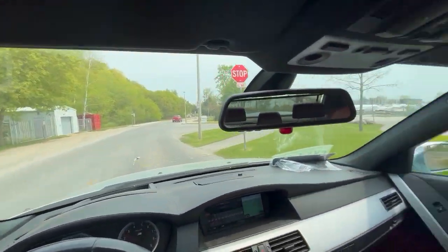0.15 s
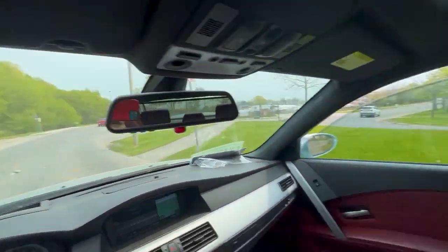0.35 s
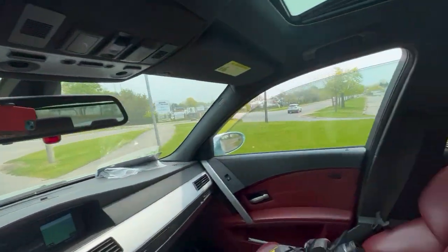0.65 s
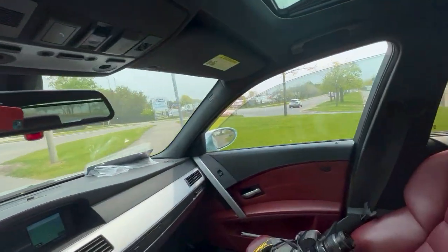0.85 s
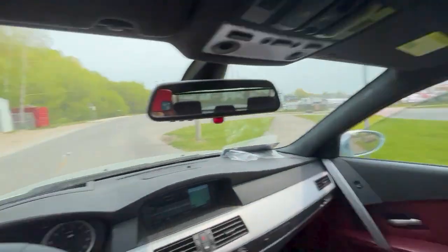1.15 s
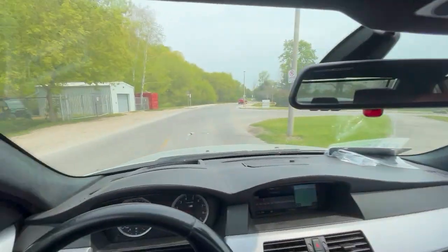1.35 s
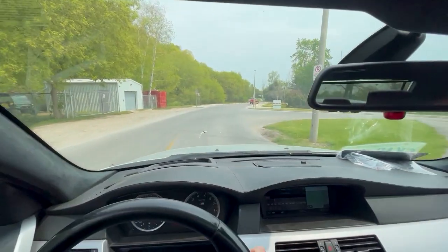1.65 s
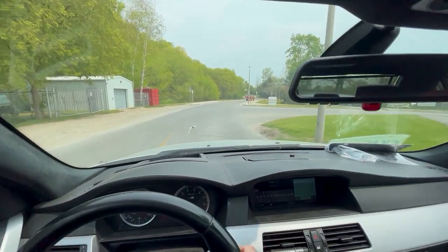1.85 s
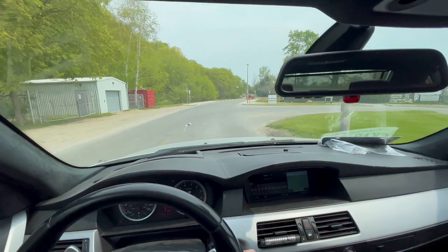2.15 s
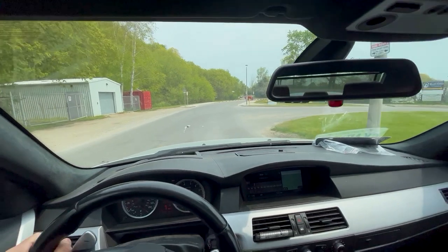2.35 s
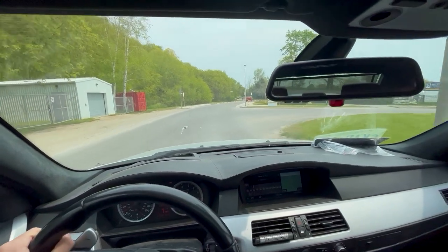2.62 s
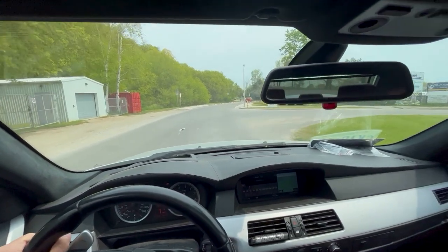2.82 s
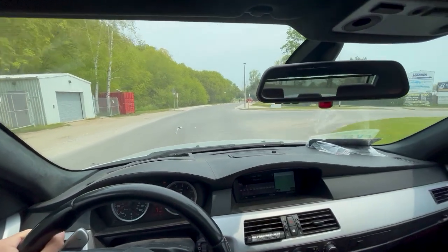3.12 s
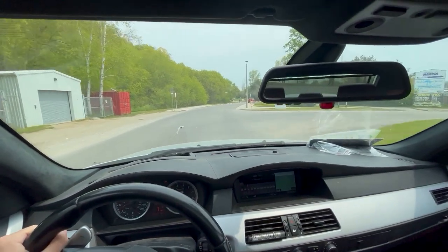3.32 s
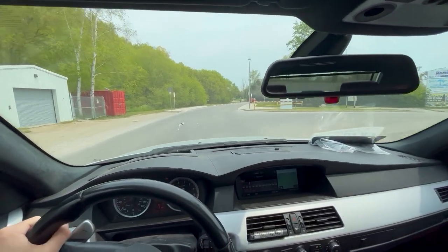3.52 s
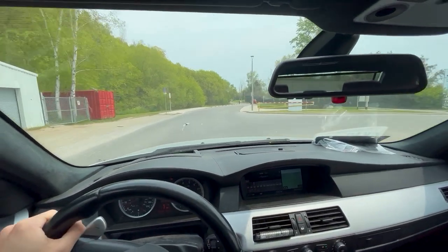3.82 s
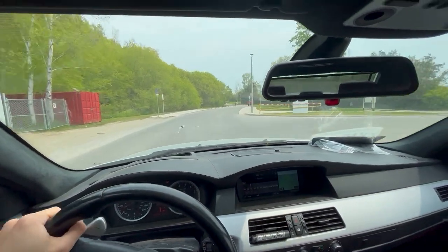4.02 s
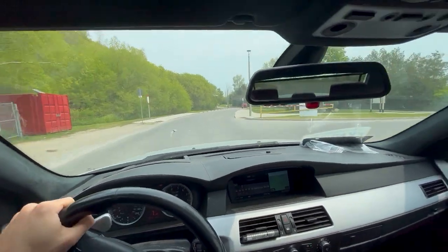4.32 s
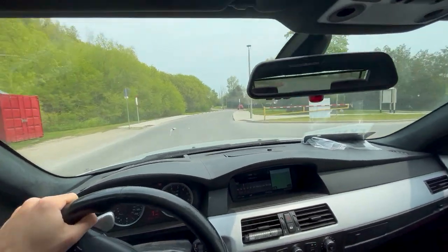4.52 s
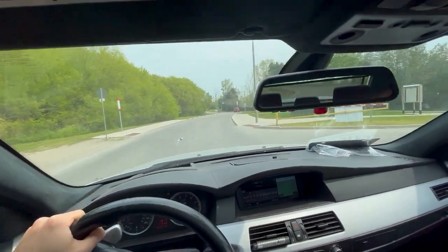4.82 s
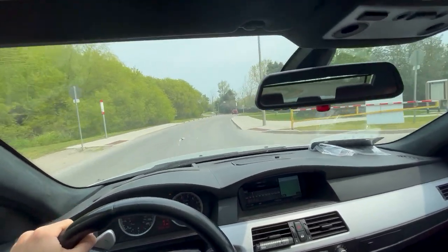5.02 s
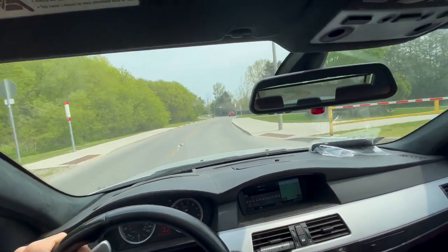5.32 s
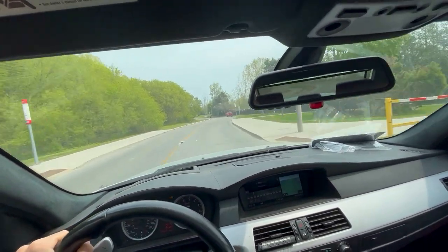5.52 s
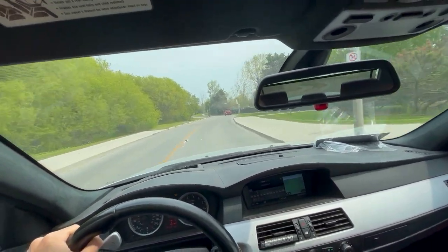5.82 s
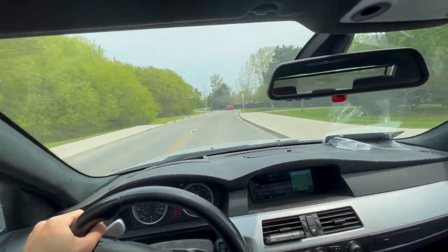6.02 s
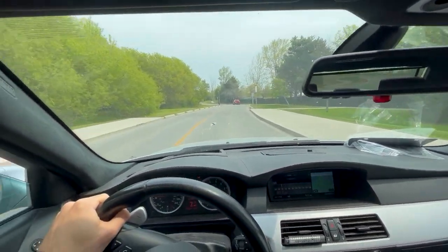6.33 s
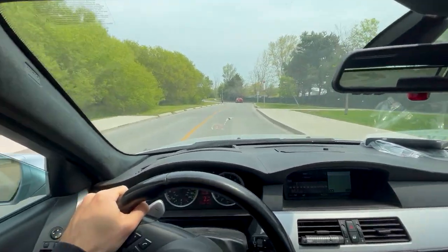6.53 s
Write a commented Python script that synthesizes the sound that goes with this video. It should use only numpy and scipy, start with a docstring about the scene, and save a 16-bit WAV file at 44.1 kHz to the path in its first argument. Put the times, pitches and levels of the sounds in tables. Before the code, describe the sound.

Heard with two ears inside a closed car, a powerful engine winds down, its exhaust booming over low road rumble and a faint belt whine. Trim ticks and squeaks, clothing rustles and a few dull knocks sound. The car then pulls away hard, the exhaust climbing in pitch and swelling through the cabin. The driver lifts off, the pitch falls, and a loose panel buzzes briefly.

```python
"""Inside the closed cabin of a ten-cylinder car, heard with two ears. First the car slows, its exhaust
booming over road rumble, engine roar and a faint belt whine, while trim ticks and squeaks. From 1 s,
clothing rustles and dull knocks join in. At 2 s the car pulls away hard: the exhaust tones climb, each
booming as it sweeps through the cabin's resonance. At 5.4 s the driver lifts off and the pitch falls.
Near the end a loose panel buzzes."""
import sys
import numpy as np
from scipy import signal
from scipy.fft import rfft, irfft, next_fast_len
from scipy.io import wavfile
from scipy.ndimage import uniform_filter1d, minimum_filter1d

SR = 44100
rng = np.random.default_rng(int(sys.argv[2]) if len(sys.argv) > 2 else 0)


def master(y):
    """Save y as 16-bit WAV."""
    cut = np.clip(np.atleast_2d(y).T, -1, 1)
    pcm = np.round(cut * 32767)  # scale
    wavfile.write(sys.argv[1], SR, pcm.astype(np.int16))


N = 294052


def from_db(db):
    """Turn decibels into a number to multiply by."""
    return 10 ** (np.asarray(db) / 20)


def rms_one(x):
    """Scale a signal so that its average size (rms) is 1."""
    return x / np.sqrt(np.mean(x ** 2) + 1e-20)


def in_time(rows):
    """Join a table's points in time with straight lines: one curve for each value column."""
    times, *columns = np.transpose(rows)
    return [np.interp(np.arange(N) / SR, times, column) for column in columns]


def at_hz(rows, hz, column=1):
    """Look up a table's value at a frequency, on a scale of octaves."""
    table = np.array(rows)
    return np.interp(np.log(hz), np.log(table[:, 0]), table[:, column])


def drift(rate_hz):
    """A smooth random wander of typical size 1."""
    step, warm_up = 40, 2000
    pole = np.exp(-2 * np.pi * rate_hz * step / SR)
    noise = rng.standard_normal(N // step + warm_up + 2)
    slow = signal.lfilter([1], [1, -2 * pole, pole * pole], noise)[warm_up:]
    return np.interp(np.arange(N) / step, np.arange(len(slow)), rms_one(slow))


def coloured(spectrum, column=1):
    """Noise with its lows and highs shaped by a table."""
    size = next_fast_len(N)
    hz = np.maximum(np.arange(size // 2 + 1) * SR / size, 1)
    return irfft(rfft(rng.standard_normal(size)) * from_db(at_hz(spectrum, hz, column)), size)[:N]


def band(x, low_hz, high_hz, order=1):
    """Keep the part of a sound between two frequencies."""
    edges_hz = [low_hz, min(high_hz, SR * .45)]
    return signal.sosfilt(signal.butter(order, edges_hz, "band", fs=SR, output="sos"), x)


def panned(x, pan_db):
    """Share a sound between the ears; pan is how much louder the left one is."""
    return x * np.vstack([from_db(pan_db / 2), from_db(-pan_db / 2)])


def add(out, start_s, sound, level_db, pan_db):
    """Mix in a short two-ear sound."""
    at = round(start_s * SR)
    out[:, at:at + sound.shape[1]] += from_db(level_db) * panned(sound, pan_db)


def bursts(rows, spread, fade_s, attack_s, snap=.01):
    """Bursts of pitched noise that fall 60 dB in fade_s, each starting with a bright snap."""
    out, t = np.zeros((2, N)), np.arange(SR // 8) / SR
    for start_s, level_db, hz, pan_db in rows:
        noise = rng.standard_normal((2, len(t)))
        noise[1] = .7 * noise[0] + .7 * noise[1]  # the ears hear partly the same noise
        body = rms_one(band(noise, hz / spread, hz * spread, order=2)) * from_db(-60 * t / fade_s)
        crack = snap * band(noise, 2500, 15000) * from_db(-60 * t / 0.014)
        add(out, start_s, (body + crack) * np.minimum(t / attack_s, 1) / 2, level_db, pan_db)
    return out


# How fast the engine's crankshaft turns: t/s, speed/(turns per s)
ENGINE_SPEED = [(0.0, 39.2), (0.38, 35.8), (0.5, 34.0), (0.75, 29.4), (1.0, 25.2), (1.12, 24.2),
                (1.28, 23.8), (1.5, 22.0), (1.62, 23.0), (1.88, 23.0), (2.0, 23.7), (2.5, 31.4),
                (2.62, 34.0), (3.0, 41.7), (3.5, 51.9), (4.0, 60.5), (4.25, 64.2), (4.62, 69.1),
                (5.0, 71.3), (5.15, 70.3), (5.4, 70.5), (5.62, 62.0), (5.75, 58.6), (5.88, 56.2),
                (6.12, 55.4), (6.38, 51.3), (6.5, 49.7), (6.67, 48.8)]
# How strong and how sharp the firing pulses are: t/s, strength/dB, sharpness/dB
FIRING = [(0.0, -8.5, -17.5), (0.4, -1.5, -19.5), (0.75, -12.5, -17.5), (1.05, -5, -14.5), (1.5, -5.5, -17),
          (1.62, -13.5, -16), (1.85, -11, -14), (2.02, -0.5, -11), (2.3, 0.5, -7), (2.62, 1, -4),
          (2.95, -2, -9), (3.2, -0.5, -1.5), (3.4, 2, -2), (3.6, 1.5, 3.5), (3.95, 1, -2), (4.2, -4, 0.5),
          (4.62, -3.5, -5.5), (5.4, -4.5, -10), (5.5, -4.5, -13), (5.85, -7, -12), (6.26, -8, -9),
          (6.34, -2.5, -9.5), (6.67, 1.5, -11.5)]
def engine():
    """The engine's speed, pulse strength and pulse sharpness at every moment."""
    return in_time(ENGINE_SPEED) + in_time(FIRING)


# Standing waves make a tone differ between the ears: f/Hz, pan/dB, left ear's lead/rad
STANDING_WAVES = [(35, 0, 0), (80, 1.5, .2), (150, 0, .3), (172, 3, 1.3), (205, 5, .3), (235, .5, -2.8),
                  (260, 1, -1.4), (315, -3.5, -3.3), (345, -4.5, -4.5), (386, -8, -5.1), (426, -4, -3.6),
                  (465, 2, -3.1), (495, 5.5, -4.8), (521, 4.5, -4.6), (585, 1, -5.2), (640, -.5, -4),
                  (780, 2, -3.4), (870, -3, -1.5), (1250, 3, -1)]
def engine_tone(order, speed, level_db, waver, across=1):
    """A tone at `order` times the engine speed; across=0 makes it the same at both ears."""
    hz = order * speed
    phase = 2 * np.pi * (np.cumsum(hz) / SR + rng.random()) + waver
    pan_db = across * at_hz(STANDING_WAVES, hz)
    lead = across * at_hz(STANDING_WAVES, hz, column=2)
    return np.sqrt(2) * panned(from_db(level_db), pan_db) * np.sin([phase + lead / 2, phase - lead / 2])


# Higher pitches at which exhaust and cabin ring: f/Hz, width/Hz, level/dB
RESONANCES = [(228, 14, -33), (270, 40, -27), (323, 54, -27.5), (418, 26, -27.5), (523, 42, -22.5),
              (590.8, 11, -23.5), (684, 110, -26.5), (855, 60, -33)]
def resonance_db(hz):
    """A tone gets louder as it nears one of the ringing pitches."""
    peaks = [from_db(db) ** 2 / (1 + (2 * (hz - centre_hz) / width_hz) ** 4)
             for centre_hz, width_hz, db in RESONANCES]
    return 10 * np.log10(sum(peaks))


# The main tones: order/(cycles per turn). 1 is the crank's unbalance, 2.5 one row of cylinders firing,
# 3.5 and 4 unequal cylinders, 5 all ten firing; the higher ones are overtones.
MAIN_ORDERS = (1, 2.5, 3.5, 4, 4.5, 5, 7.5, 12.5, 15)
# One row for each main tone: boom level/dB, share of strength, ring level/dB, share of sharpness
MAIN_MIX = [(0.7, .1, -19, .3), (-0.37, 0.83, -11.5, .3), (-25, 0.42, 1, .9), (-20, 0.47, -1.5, 3.4),
            (-22.5, 0.35, -5.5, 0.71), (0.4, 1.0, -0.04, 1.2), (-10.5, 0.58, -1.5, 1.1),
            (-19.5, .3, -9, 1.6), (-17.5, .3, -19, 1.6)]
# The cabin's deep boom, strongest near 110 Hz: f/Hz, level/dB
CABIN_BOOM = [(22, -56), (40, -40), (52, -28.5), (72, -21.5), (90, -12.5), (111, -4), (136, -5.5),
              (150, -9), (158, -16), (163, -35.5), (200, -48.5), (1000, -59)]
def exhaust_boom(speed, strength_db, sharpness_db):
    """Firing pulses make tones that swell as they slide through the boom and the higher resonances."""
    out = 0
    for order, (boom_db, strength_share, ring_db, sharp_share) in zip(MAIN_ORDERS, MAIN_MIX):
        hz = order * speed
        boom = from_db(boom_db + at_hz(CABIN_BOOM, hz) + strength_share * strength_db + .5 * drift(8))
        ring = from_db(ring_db + resonance_db(hz) + sharp_share * sharpness_db + 1.8 * drift(7))
        out += engine_tone(order, speed, 20 * np.log10(boom + ring), waver=.025 * order * drift(10))
    return out


# The weaker tones: order/(cycles per turn)
WEAK_ORDERS = (2, 3, 5.5, 6, 6.5, 7, 8, 8.5, 9, 9.5, 10, 10.5, 11.5, 12, 13.5, 17.5)
# The base level of each weaker tone: level/dB
WEAK_LEVELS = [-33, -31, -35, -34, -36, -36, -37, -37, -37, -36, -33, -36, -37, -37, -37, -35]
# How much of them the car's body and cabin let through: f/Hz, level/dB
CAR_BODY = [(25, -9), (60, 0), (110, 0), (150, 0), (180, -7), (260, -3), (330, -10), (410, -11), (470, -17),
            (560, -18), (700, -15), (800, -22), (1000, -32), (1300, -40)]
def exhaust_flutter(speed, sharpness_db):
    """No two cylinders are alike, so weaker, fluttering tones sound too."""
    out = 0
    for order, base_db in zip(WEAK_ORDERS, WEAK_LEVELS):
        lift_db = sharpness_db * order / 7.5  # harder pulses lift the high tones most
        level_db = base_db + lift_db + at_hz(CAR_BODY, order * speed) + 4 * drift(3.5)
        out += engine_tone(order, speed, level_db, waver=.04 * order * drift(5))
    return out


# When each whine sounds: order/(cycles per turn), start/s, end/s, level/dB
WHINES = [(11, -.3, .4, -50), (11, 2.9, 6.9, -62), (22, -.3, .25, -65), (22, 4.4, 5.1, -66),
          (31.4, 3.0, 4.3, -68), (40.6, -.3, 2.6, -73), (40.6, .7, .85, -66), (40.6, 2.8, 3.3, -67)]
def belt_whine(speed, fade_s=.33, fade_db=31):
    """The belt drive turns with the engine and gives faint whines that come and go."""
    out, t = 0, np.arange(N) / SR
    for order, start_s, end_s, whine_db in WHINES:
        outside_s = np.abs(t - np.clip(t, start_s, end_s))
        level_db = whine_db - fade_db * outside_s / fade_s + 3 * drift(8)
        out += engine_tone(order, speed, level_db, waver=.04 * order * drift(14), across=0)
    return out


# How loud the road is: t/s, level/dB
ROAD_LEVEL = [(0.0, -25), (0.7, -23), (1.0, -34.5), (1.4, -28), (1.9, -37.5), (2.3, -25.5), (3.0, -15),
              (3.4, -21.5), (3.8, -18), (4.8, -18), (5.3, -16), (6.0, -16.5), (6.67, -18.5)]
# The rumble's tone colour: f/Hz, level/dB
ROAD_COLOUR = [(15, -44), (25, -17), (38, -12), (54, -3), (70, 3), (108, 5), (129, -1), (151, -2),
               (200, -24), (260, -39.5), (440, -120)]
def road_rumble():
    """Tyres on the road make a low rumble, nearly the same at both ears."""
    level_db, = in_time(ROAD_LEVEL)
    alike = rms_one(coloured(ROAD_COLOUR))
    opposed = from_db(-13.5) * rms_one(band(coloured(ROAD_COLOUR), 70, 110))
    return from_db(level_db) * np.array([alike + opposed, alike - opposed])


def cabin_noise(spectrum, level_db):
    """Wavering noise: one part is alike at both ears, the other pushes at one as it pulls at the other."""
    alike, opposed = coloured(spectrum), coloured(spectrum, column=2)
    ears = np.array([alike + opposed, alike - opposed]) / np.sqrt(np.mean(alike ** 2))
    return from_db(level_db + .5 * drift(6)) * ears


def driven_db(base_db, octave_db, sharp_share, road_share, floor_db):
    """A noise level that grows with engine speed, pulse sharpness and road rumble, over a steady floor."""
    speed, _, sharpness_db = engine()
    road_db, = in_time(ROAD_LEVEL)
    octaves = np.log2(speed / 40)  # doublings from 40 turns per s
    level_db = base_db + octave_db * octaves + sharp_share * sharpness_db + road_share * road_db
    return 10 * np.log10(from_db(level_db) ** 2 + from_db(floor_db) ** 2)


# Tone colours of the low growl and the higher roar: f/Hz, alike level/dB, opposed level/dB
GROWL_COLOUR = [(30, -91.5, -79.5), (70, -62, -37.5), (130, -22.5, -7), (148, 8.5, -0.5), (274, 1.5, -9),
                (323, -9, -4.5), (444, -7.5, -13), (610, -19.5, -11.5), (820, -30, -24.5),
                (1500, -81.5, -81.5)]
ROAR_COLOUR = [(300, -53, -52), (560, -1, 4), (700, 0, 3.5), (750, -3, -1.5), (1010, -0.5, 3.5),
               (1070, -4.5, 0), (1310, -9.5, -4.5), (1560, -12, -9), (1900, -15, -16), (2200, -18, -17.5),
               (2315, -20, -17.5), (3320, -28, -32), (6000, -78.5, -76.5)]
# How loud the growl is: t/s, level/dB
GROWL_LEVEL = [(0.0, -46.5), (0.67, -52), (1.04, -46.5), (1.5, -47.5), (2.2, -40), (2.5, -40.5),
               (2.75, -35), (3.03, -42), (3.3, -35), (3.8, -29.5), (4.2, -28.5), (4.55, -33.5),
               (5.1, -31.5), (5.9, -35.5), (6.2, -37.5), (6.67, -35.5)]
def engine_roar():
    """Broad engine and air noise, which swells as the car pulls away."""
    roar_db = driven_db(base_db=-50, octave_db=9, sharp_share=.18, road_share=.17, floor_db=-63.5)
    return cabin_noise(GROWL_COLOUR, *in_time(GROWL_LEVEL)) + cabin_noise(ROAR_COLOUR, roar_db)


# The hum's tone colour: f/Hz, alike level/dB, opposed level/dB
HUM_COLOUR = [(199, -59, -58.5), (327, -9.5, -16), (433, 2, -7), (506, -11.5, -12), (570, -15, -16.5),
              (900, -62, -59.5)]
def cabin_hum():
    """The air in the cabin gives a steady, hollow hum."""
    return cabin_noise(HUM_COLOUR, level_db=-58)


# The hiss's tone colour: f/Hz, level/dB
HISS_COLOUR = [(1530, -29.5), (2600, -1), (3530, -1.5), (4830, -1.5), (8980, -12), (9750, -13.5),
               (11600, -29), (12200, -48.5), (13200, -43), (14000, -21.5), (15500, -28.5)]
def air_hiss(hiss_db):
    """High, slightly grainy air noise, a little louder on the right."""
    grain = from_db(1.2 * drift(60) + .5 * drift(12))
    alike = rms_one(coloured(HISS_COLOUR))
    opposed = from_db(1.5) * rms_one(coloured(HISS_COLOUR))
    ears = np.array([alike + opposed, alike - opposed])
    return .85 * from_db(hiss_db) * grain * panned(ears, pan_db=-1.3)


# Where the body panels ring: f/Hz, width/Hz, level/dB
BODY_PANELS = [(1800, 250, -72.5), (3000, 270, -76.5), (4520, 500, -75)]
def panel_rasp(hiss_db):
    """Body panels colour the hiss with fluttering bands of noise that rise and fall with it."""
    out = 0
    for hz, width_hz, level_db in BODY_PANELS:
        noise = band(rng.standard_normal((2, N)), hz - width_hz / 2, hz + width_hz / 2)
        out += from_db(level_db + hiss_db - hiss_db.mean() + 3 * drift(10)) * rms_one(noise)
    return out


# The clearer ticks: t/s, level/dB, f/Hz, pan/dB
TICKS = [(0.1107, -47.5, 4510, 0.5), (0.7597, -46.5, 6740, -4), (1.0725, -57.5, 4240, -21.5),
         (1.1394, -46, 8500, 1), (1.4896, -55, 4550, -4.5), (1.5843, -61, 4380, -22),
         (1.6113, -55.5, 4710, -7.5), (1.8951, -52, 5220, -10), (2.3446, -46, 4200, -12.5),
         (2.7332, -51, 2980, 5), (3.1039, -49, 4390, -15), (3.5993, -45.5, 3300, -11.5),
         (4.382, -48, 4900, -11), (4.5651, -42.5, 6640, -6), (4.7177, -43.5, 5600, -11),
         (4.813, -31, 5100, -11)]
def trim_ticks(faint_per_s=4):
    """The cabin's trim ticks sharply at set times, and faintly at random in between."""
    gap, size, colour, side = rng.random((60, 4)).T
    times = np.cumsum(-np.log(1 - gap) / faint_per_s)
    level_db = -61 + 5 * (size - .5)
    hz = 4600 * (1 + .1 * (colour - .5))
    pan_db = 16 * (side - .6)
    faint = [row for row in zip(times, level_db, hz, pan_db) if row[0] < N / SR - .2]
    return bursts(TICKS + faint, spread=1.3, fade_s=.07, attack_s=.001, snap=.9)


# Each squeak: t/s, level/dB, f/Hz, pan/dB
SQUEAKS = [(.115, -56, 4500, -4), (.34, -53, 1980, 0), (.765, -55, 6300, -6), (4.86, -58, 4550, -5)]
def trim_squeaks():
    """The trim squeaks briefly: noise in so narrow a band that it has a clear pitch."""
    return bursts(SQUEAKS, spread=1.02, fade_s=.15, attack_s=.01)


# Each rub of cloth: t/s, length/s, level/dB, pan/dB
RUSTLES = [(1.02, 0.096, -61, -4.5), (1.179, 0.084, -58, -0.5), (1.393, 0.26, -65, -3.5),
           (2.071, .06, -64.5, -13.5), (2.238, 0.17, -54, -2), (2.618, 0.067, -67, -0.5),
           (3.613, 0.216, -60, -2), (4.567, 0.036, -52.5, -1.5), (4.835, .24, -56, -6)]
def clothing_rustles():
    """Cloth rubs close by, making an uneven crackle that swells and fades with each stroke."""
    out, t = np.zeros((2, N)), np.arange(SR // 4) / SR
    for start_s, length_s, level_db, pan_db in RUSTLES:
        stroke = np.sin(np.pi * np.clip(t / length_s, 0, 1))
        clumps = from_db(5.5 * rms_one(band(rng.standard_normal(len(t)), 25, 300)))
        grains = rng.standard_normal((2, len(t))) * clumps
        add(out, start_s, rms_one(band(grains, 3200, 9000)) * stroke, level_db, pan_db)
    return out


# Each knock: t/s, level/dB, f/Hz, pan/dB
KNOCKS = [(1.05, -39, 280, 8), (1.535, -50, 650, 3), (1.583, -46, 650, 3), (1.798, -43, 550, 3),
          (1.80, -49, 1400, 0), (1.894, -45, 650, 0), (1.896, -51, 1750, -2), (2.085, -55, 2300, 0)]
def cabin_knocks():
    """Dull knocks in the cabin, lower and longer than the ticks."""
    return bursts(KNOCKS, spread=1.3, fade_s=.11, attack_s=.002)


# Each slap of the loose panel: t/s, level/dB
SLAPS = [(6.324, -39), (6.336, -36.5), (6.348, -33), (6.36, -33.5), (6.376, -33), (6.398, -40)]
# The pitches at which that panel rings: f/Hz, level/dB
PANEL_RINGS = [(1100, 0), (1750, -9), (2300, -9), (3600, -17)]
def panel_buzz():
    """A loose panel slaps and rings several times, so quickly that it buzzes."""
    rows = [(start_s, slap_db + ring_db, hz, 0) for start_s, slap_db in SLAPS
            for hz, ring_db in PANEL_RINGS]
    return bursts(rows, spread=1.14, fade_s=.045, attack_s=.002)


def scene():
    """Add up all the sounds at the two ears."""
    speed, strength_db, sharpness_db = engine()
    hiss_db = driven_db(base_db=-60, octave_db=6.5, sharp_share=.24, road_share=.23, floor_db=-81.5)
    noise = engine_roar() + air_hiss(hiss_db) + panel_rasp(hiss_db)
    exhaust = exhaust_boom(speed, strength_db, sharpness_db) + exhaust_flutter(speed, sharpness_db)
    driving = exhaust + belt_whine(speed) + road_rumble() + noise + cabin_hum()
    return driving + trim_ticks() + trim_squeaks() + clothing_rustles() + cabin_knocks() + panel_buzz()


def record(dry, low_hz=34, top_hz=15800, limit=.985, clock_hz=9600, clock_db=-60.5):
    """Thin the deepest bass, hold down peaks, let a weak electronic clock ripple the level, cut the top."""
    wet = signal.sosfilt(signal.butter(2, low_hz, "high", fs=SR, output="sos"), dry)
    safe_gain = np.minimum(1, limit / (np.abs(wet).max(axis=0) + 1e-9))
    wet *= uniform_filter1d(minimum_filter1d(safe_gain, size=1401), size=1401)  # ease over about 30 ms
    clock = from_db(clock_db) * np.cos(2 * np.pi * clock_hz * np.arange(N) / SR)
    return signal.sosfilt(signal.cheby2(12, 70, top_hz, fs=SR, output="sos"), wet * (1 + clock))


dry = scene()
out = record(dry)
master(out)
```